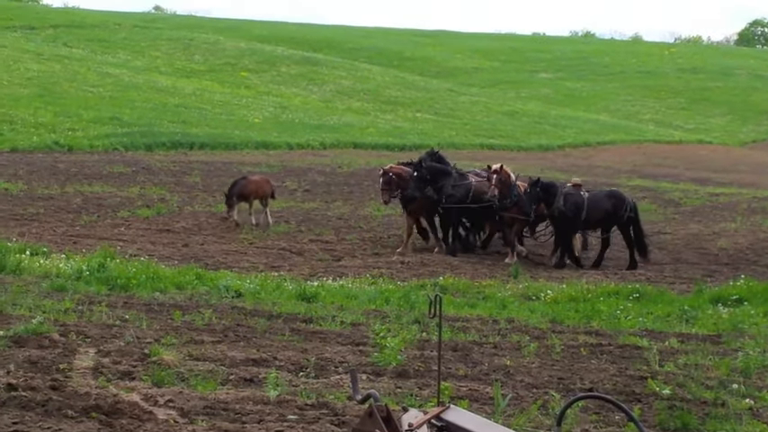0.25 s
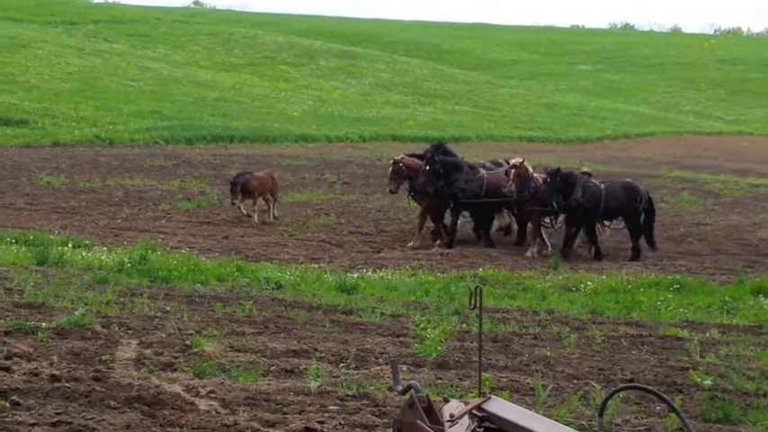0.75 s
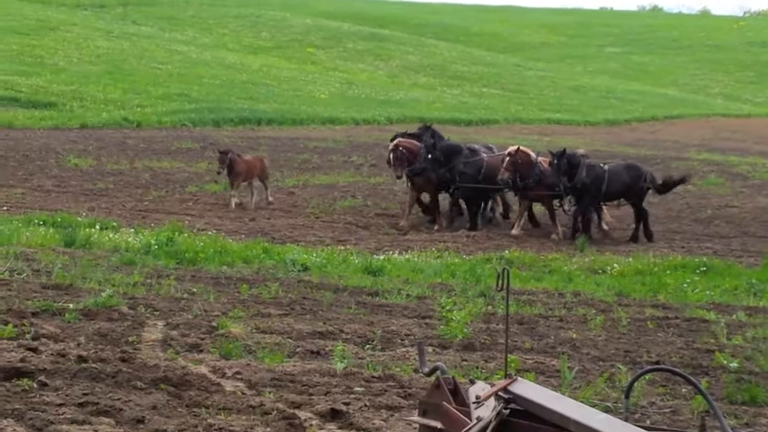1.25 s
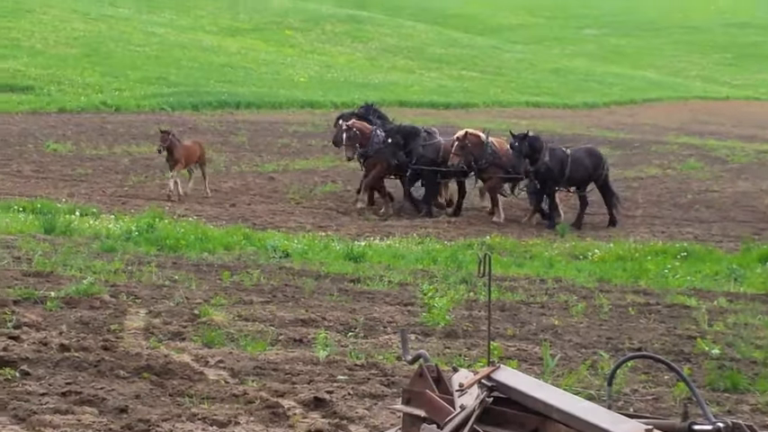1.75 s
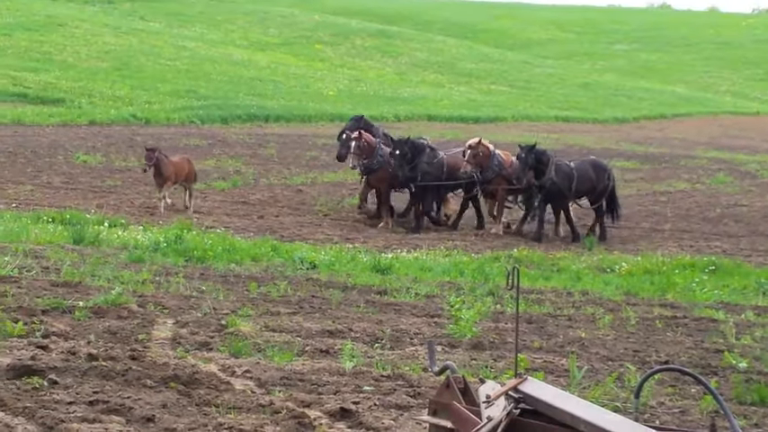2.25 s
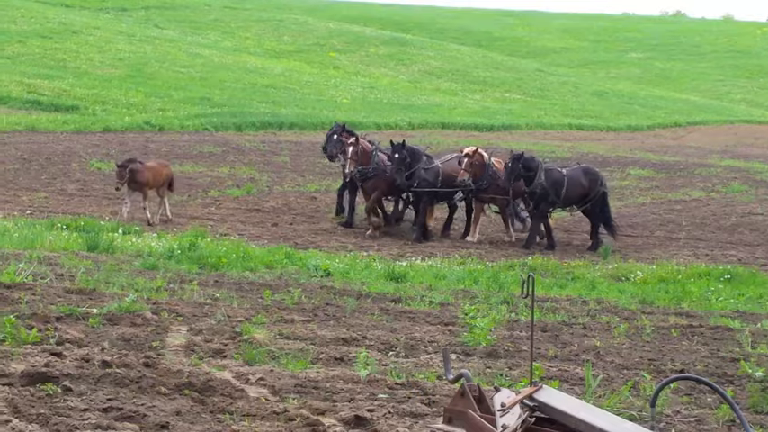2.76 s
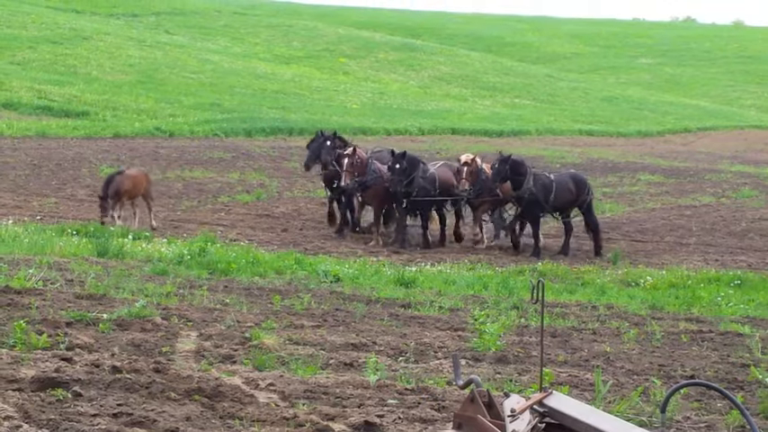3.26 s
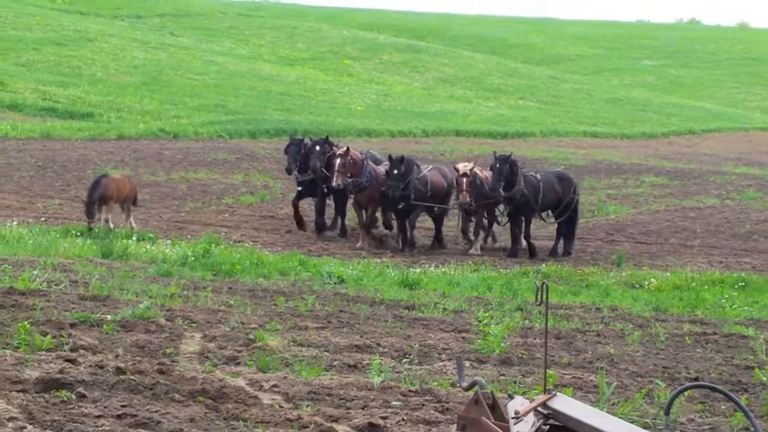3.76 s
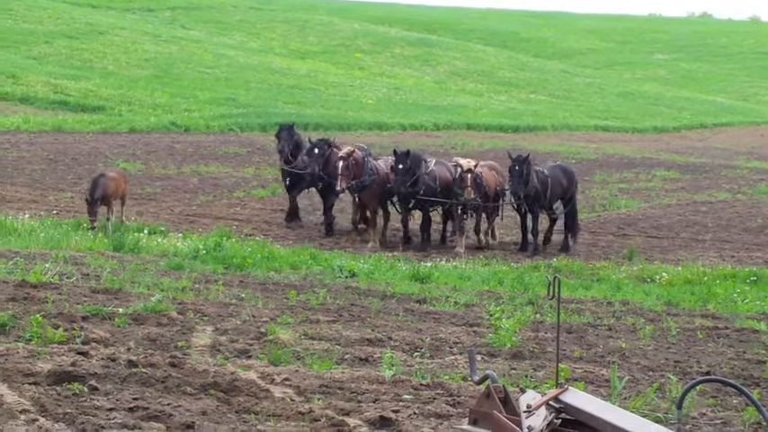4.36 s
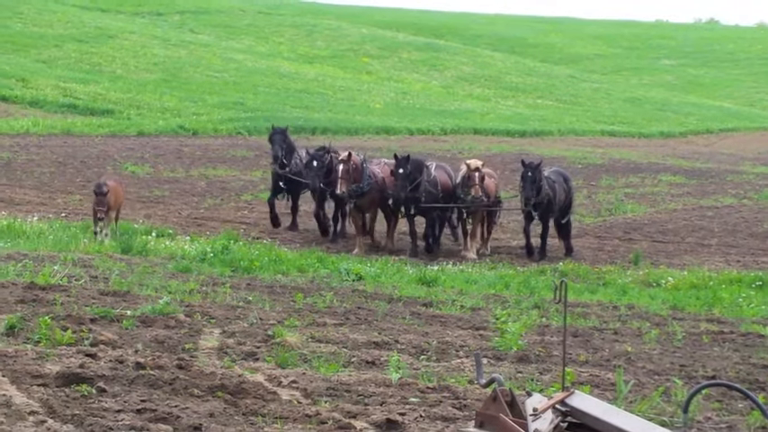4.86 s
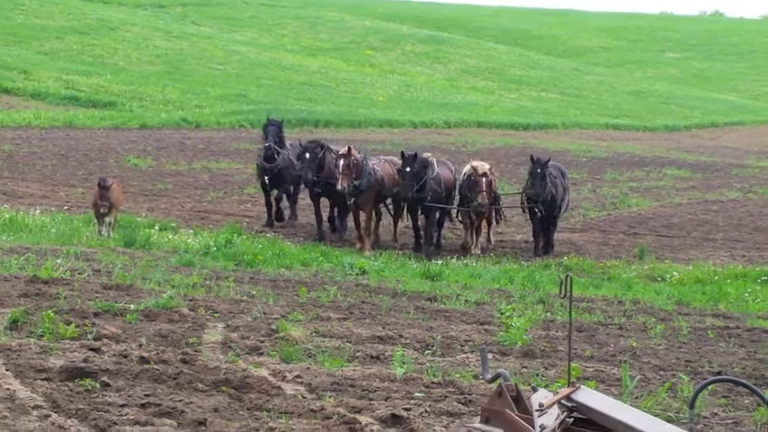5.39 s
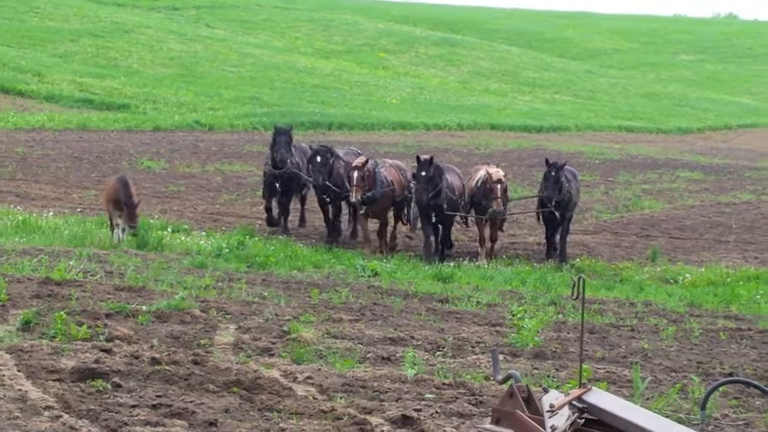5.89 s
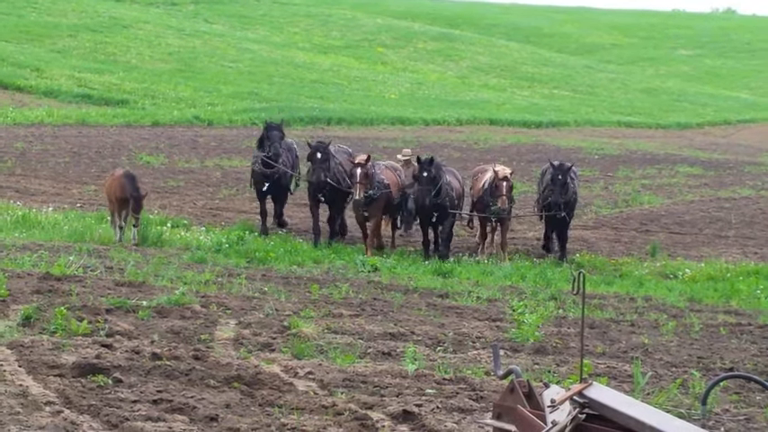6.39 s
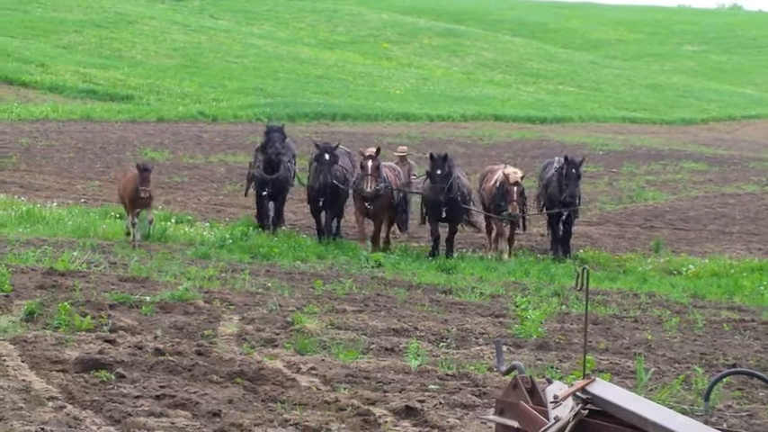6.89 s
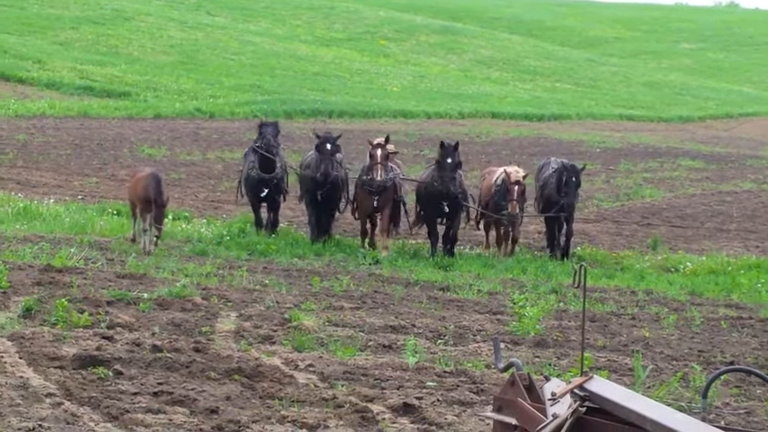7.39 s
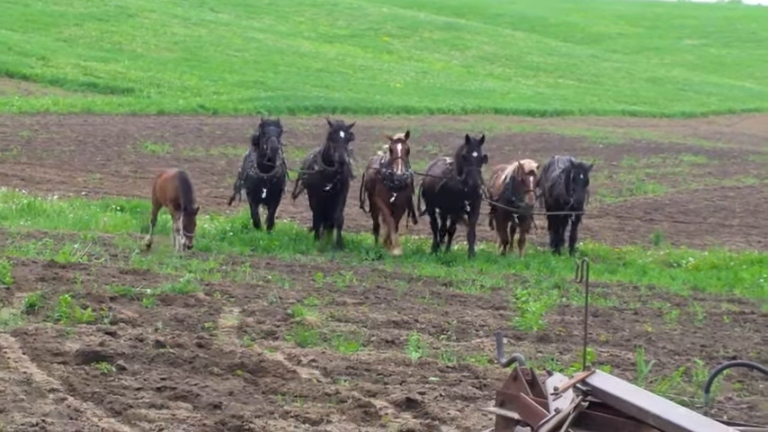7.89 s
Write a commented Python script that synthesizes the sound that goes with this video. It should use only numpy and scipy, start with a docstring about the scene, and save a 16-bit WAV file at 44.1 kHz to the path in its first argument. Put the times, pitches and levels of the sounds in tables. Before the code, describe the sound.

Harness chains jingle and clink as draft horses walk closer over soft soil, with birds, a light breeze and a distant engine hum.

```python
"""Draft horses in a field

A team in harness walks closer over tilled ground. Chain links jingle and clink as they hit
each other, hitch bars knock, rings ping, and iron creaks as it sticks and slips.
Soil and leather rustle, and hooves thud softly. Small birds whistle gliding notes,
and a far engine hums and throbs under a light breeze."""
import sys
import numpy as np
from scipy import signal
from scipy.fft import rfft, irfft
from scipy.io import wavfile
from scipy.ndimage import uniform_filter1d

SR = 44100
rng = np.random.default_rng(int(sys.argv[2]) if len(sys.argv) > 2 else 0)


def transcribe(u):
    """Save the signal u as a 16-bit wav file named by the first command-line argument.

    u: samples, shape (n,) or (channels, n), limited to [-1, 1]; the rate is SR.
    q: integer samples, one column per channel.
    """
    v = np.clip(np.atleast_2d(u).T, -1, 1)
    q = np.round(v * 32767).astype(np.int16)
    wavfile.write(sys.argv[1], SR, q)


N = 358885
T = np.arange(N) / SR

# Levels compare the rows of a table; each source sets its own overall loudness.
# A "fade" (t60 in the code) is the time a sound takes to drop by 60 dB.
# the team grows louder as it nears: t/s, jingle level/dB, rustle level/dB
TEAM_LEVELS = [(0, -72, -73.5), (0.55, -72.5, -81), (0.85, -68, -70.5), (1.75, -63, -70), (2.2, -67, -73.5),
               (3.0, -68, -72.5), (3.6, -63.5, -68), (3.98, -70, -76), (4.45, -61, -66), (5.3, -59, -65.5),
               (5.65, -55.5, -61.5), (6.25, -57.5, -62), (6.85, -55, -60), (8.14, -51.5, -56.5)]
# the harness noise swells, mostly as a horse leans into its chains: t/s, boost/dB, settling time/s
TUGS = [(0.72, 12, 0.086), (1.55, 5.5, 0.25), (2.0, 14, 0.042), (2.42, 10.5, 0.32), (2.73, 12, 0.13),
        (3.40, 6, 0.16), (3.77, 8.5, 0.12), (4.12, 8, 0.21), (4.57, 3, 0.081), (5.18, 4.5, 0.1),
        (5.76, 3, 0.28), (6.07, 3.5, 0.057), (6.38, 4, 0.47), (6.62, 2, 0.078), (7.0, 2.5, 0.46),
        (7.42, 7, 0.21), (7.72, 9, 0.41), (7.96, 9, 0.082)]
# tone colour of the jingling chains: f/Hz, level/dB
JINGLE_SPECTRUM = [(3000, -5), (4500, 5), (5400, -10), (6300, 1), (7400, -1), (8400, -4), (9400, -18),
                   (10400, -12.5), (11600, -26.5), (13500, -11), (15500, -25)]
# the notes of the harness rings: f/Hz, level/dB, fade/s
RING_NOTES = [(5090, -2, .14), (5560, -4, .12), (9970, -1, .16), (10180, -3, .14), (10960, -8, .14),
              (13380, -11, .12)]
# how far each pitch of the harness leans left or right: f/Hz, left minus right/dB
HARNESS_BALANCE = [(1000, -5.5), (4000, -4), (5500, 8), (6500, 1), (7600, -17.5), (9000, -24), (10000, -25),
                   (11000, 2), (15000, -8)]
# chain links clash: t/s, level/dB, f/Hz, chatter relative to that level/dB
CLINKS = [(0.835, -44.5, 7150, -11), (1.587, -45, 6100, -7), (1.9685, -24, 7400, -26),
          (2.696, -31.5, 7090, -23), (2.752, -38, 7300, -16), (2.468, -40, 5560, -10.5),
          (3.4075, -35, 7380, -26), (4.104, -41, 7620, -11), (4.48, -34, 7700, -20),
          (4.5426, -24.5, 7540, -20), (4.79, -26.5, 7580, -18), (5.159, -29, 6700, -15),
          (5.37, -37, 7900, -23), (5.473, -38, 8270, -7.5), (5.704, -32, 7000, -12),
          (5.718, -38, 7900, -18), (5.779, -34, 8470, -22), (6.028, -24.5, 7170, -19),
          (6.043, -33, 7400, -14), (6.301, -34.5, 8540, -26), (6.353, -26.5, 7570, -37),
          (6.602, -38, 8450, -22), (6.6117, -21, 7130, -22), (6.648, -38, 7800, -25),
          (6.788, -30, 7760, -30), (6.963, -29, 6730, -17), (7.23, -37.5, 8600, -22),
          (7.263, -30, 8160, -15), (7.42, -31.5, 7700, -18), (7.588, -38, 9400, -15),
          (7.641, -37, 7400, -24), (7.673, -38.5, 8350, -4), (7.7032, -32.5, 8000, 1),
          (7.937, -30.5, 9100, -12.5), (7.993, -34, 8630, -10.5), (8.1294, -27.5, 7730, -18)]
# hitch bars and buckles knock: t/s, level/dB, f/Hz, bandwidth/Hz
KNOCKS = [(0.7153, -51, 2100, 1200), (1.968, -44, 3480, 1500), (1.9903, -37, 2550, 380),
          (2.397, -49, 2950, 700), (2.693, -48, 3820, 1700), (3.408, -47.5, 2500, 1400),
          (4.100, -48, 2090, 1300), (4.1767, -43, 1860, 1000), (4.236, -50.5, 2490, 600),
          (4.453, -47.5, 1650, 1300), (4.4828, -43, 2640, 900), (4.542, -43, 1900, 1400),
          (4.761, -43.5, 2860, 1000), (4.791, -46.5, 1640, 1000), (5.371, -48, 2550, 800),
          (5.476, -39, 1880, 1100), (5.497, -33, 2240, 1310), (5.719, -42.5, 2200, 1200),
          (5.778, -38.5, 3300, 1500), (5.8148, -42.5, 2300, 1000), (6.352, -41, 2270, 1700),
          (7.232, -39, 2970, 900), (7.264, -31.5, 4050, 1300), (7.641, -45, 3100, 900),
          (7.708, -20.5, 3420, 1400), (7.819, -36, 2930, 1200), (7.876, -37.5, 2350, 900)]
# small rings are struck, and the hitch iron rings on near 1.9 kHz after its creaks at 7.0 and 7.4 s: t/s,
# level/dB, f/Hz, fade/s
PINGS = [(1.99, -62, 13400, 0.19), (2.42, -59, 5100, 0.16), (2.70, -55, 7800, 0.28),
         (4.625, -55.5, 9980, 0.12), (4.797, -39, 9980, 0.092), (4.797, -59, 13400, 0.33),
         (5.652, -54, 10200, 0.11), (6.05, -48.5, 4780, 0.089), (6.136, -52, 10000, 0.081),
         (6.255, -51.5, 5530, 0.28), (6.484, -48.5, 9670, 0.32), (6.6, -49.5, 10000, 0.2),
         (6.995, -52.5, 1947, 0.42), (7.104, -42, 4410, 0.25), (7.104, -50, 5130, 0.39),
         (7.104, -56, 4900, 0.8), (7.104, -47.5, 9695, 0.79), (7.104, -48.5, 12530, 0.24),
         (7.339, -51, 10100, 0.4), (7.39, -48.5, 5150, 0.15), (7.40, -47.5, 9670, 0.28),
         (7.405, -47, 1936, 0.16), (7.45, -49, 11000, 0.54), (7.588, -50, 10150, 0.2),
         (7.588, -51, 11030, 0.22), (7.898, -45, 5550, 0.095), (7.995, -52, 13400, 0.15),
         (8.085, -52, 5100, 0.12), (8.085, -46.5, 10020, 0.25)]
# the hitch creaks under load: t/s, length/s, level/dB, roughness/0-1, brightness/dB per octave
CREAKS = [(1.506, 0.12, -67.5, 0.93, -12), (4.541, 0.071, -63.5, 0.86, -5), (5.485, 0.024, -47, 1, -16),
          (5.513, 0.083, -61, 1, -7), (5.702, 0.076, -59.5, 1, -23), (6.03, 0.1, -60.5, 1.05, 6),
          (6.764, 0.041, -51.5, 0.99, -13), (6.983, 0.084, -51, 0.66, -8.5), (7.388, 0.056, -54, 0.91, -12),
          (7.7086, .038, -19.5, 0.27, 2.5), (7.743, 0.062, -39.5, 0.64, 6), (7.924, 0.056, -46, 1, -18),
          (7.979, 0.038, -42, 0.64, -2.5)]
# the notes of the hitch iron: f/Hz, bandwidth/Hz, level/dB, left minus right/dB
IRON_NOTES = [(1378, 10, -7.5, -1), (1913, 8.8, -9, -6), (1950, 10, -6, -6), (2372, 13, -4.5, -7),
              (2550, 12.3, 4.7, -7), (2684, 18, -3, -7), (3190, 23, 3.7, -7), (3930, 21, -5, -7),
              (5550, 12, -22, -6), (6490, 60, -30, -6), (7400, 37, -7, -9), (8360, 78, -14, -9),
              (9650, 40, -14, -9)]
# tone colour of soil and leather: f/Hz, level/dB
RUSTLE_SPECTRUM = [(450, -5), (720, -3), (1100, -7.5), (1600, -7.5), (2400, 0), (3200, -1), (4500, 2),
                   (6000, -5), (10000, 2.5), (15000, -16)]
# the rustle's treble, duller from afar: t/s, level/dB
RUSTLE_TREBLE = [(0, -5), (2.0, -7.5), (3.6, -7), (5.0, 0), (6.3, -1.5), (8.14, -2.5)]
# bird calls: t/s, number of notes, note spacing/s, note length/s, start f/Hz, middle f/Hz, end f/Hz,
# level/dB, first note softer by/dB, share scattered by the field/0-1
BIRD_CALLS = [(0.075, 2, .68, .09, 3350, 2950, 2200, -65, 2, .5),
              (0.215, 3, .385, .09, 1450, 1540, 1850, -67, 2, .5),
              (0.3, 3, .378, .05, 2150, 2850, 3300, -60.5, 2, .65),
              (0.615, 1, 0, .13, 8300, 7870, 7780, -55, 0, .3),
              (0.70, 2, .6, .085, 1950, 2020, 2400, -59.5, 0, .55),
              (0.83, 2, .595, .085, 2200, 2000, 2080, -60.5, 0, .75),
              (0.95, 3, .265, .165, 8000, 7450, 6050, -57, 5, .5),
              (1.63, 2, .21, .08, 2920, 2900, 2550, -62, 0, .7),
              (1.735, 1, 0, .08, 3120, 3150, 2800, -60, 0, .6),
              (2.985, 3, .4995, .056, 3450, 4170, 4250, -56, 10, .25),
              (3.084, 3, .495, .042, 3620, 4170, 4650, -54.5, 11, .25),
              (3.195, 3, .495, .075, 4830, 4960, 4880, -60, 6, .25),
              (3.247, 3, .501, .062, 4950, 4270, 3900, -53.5, 6, .25),
              (4.1, 2, .395, .09, 1720, 1930, 1880, -60, 0, .7),
              (4.475, 2, .095, .055, 3700, 4080, 4250, -56, 1, .35),
              (4.903, 3, .193, .075, 6700, 6100, 5900, -52, 3, .55),
              (4.69, 4, .21, .052, 4000, 4240, 4270, -55, 3, .45),
              (4.935, 3, .2, .09, 7700, 7000, 6500, -49, 1, .95),
              (4.94, 2, .19, .09, 2900, 3150, 3130, -58.5, 0, .6),
              (4.975, 3, .19, .06, 5100, 4800, 4350, -54, 3, .5),
              (5.494, 3, .142, .13, 4300, 6380, 7300, -49, 0, .82),
              (6.187, 3, .149, .1, 2480, 2260, 2250, -52.5, 0, .6)]
# the engine's firing tone swells on the breeze: t/s, level/dB
FIRING_LEVEL = [(0, -70), (0.95, -69), (1.65, -55.5), (2.3, -60.5), (3.8, -60), (4.1, -68), (4.5, -69),
                (4.95, -53), (5.4, -49), (6.6, -55.5), (7.0, -65), (7.3, -54.5), (8.14, -56)]
# its overtones swell in turn: peak t/s, multiple of the firing tone, level/dB
OVERTONE_SWELLS = [(0.12, 2, -71), (0.86, 2, -64), (1.82, 2, -63.5), (2.73, 2, -72.5), (3.52, 2, -66),
                   (4.25, 2, -67.5), (4.6, 2, -64.5), (5.33, 2, -65), (5.78, 2, -63.5), (6.22, 2, -65),
                   (7.07, 2, -64), (7.8, 2, -66), (0.42, 3, -75.5), (1.18, 3, -65.5), (2.03, 3, -71),
                   (2.47, 3, -73), (2.77, 3, -67), (3.3, 3, -71), (3.78, 3, -69.5), (4.04, 3, -69.5),
                   (5.92, 3, -66), (7.83, 3, -67), (1.72, 4, -74), (3.72, 4, -72), (4.14, 4, -70.5)]
# a faint whine from the same engine: t/s, level/dB
WHINE_LEVEL = [(0, -96), (3.8, -83.5), (5.3, -78), (8.14, -84)]
# loudness curve shared by the breeze and the hooves: t/s, level/dB
FIELD_LEVEL = [(0, -72.5), (1.5, -68), (4.2, -67.5), (5.3, -63), (6.7, -64), (7.5, -62), (7.9, -60),
               (8.14, -62.5)]
# tone colour of the breeze: f/Hz, level/dB
BREEZE_SPECTRUM = [(15, -24), (40, 1), (55, 16), (75, 11.5), (130, 8), (250, 3.5), (450, -2), (720, 1),
                   (1100, -3), (2000, -1.5), (5000, -6.5), (10000, -10.5), (15000, -12.5)]
# how alike the breeze is on the left and right: f/Hz, likeness/0-1
BREEZE_LIKENESS = [(60, 0.98), (130, 0.86), (290, 0.66), (640, 0.22), (1400, 0), (6000, 0), (15000, 0)]


def chains(ring_spread=0.0083):
    """Many small links tick together in flurries and keep the harness rings faintly ringing."""
    pitches = np.linspace(5800, 12500, 36) * rng.uniform(0.95, 1.02, 36)
    links = [0.42 * ring(hz, rng.uniform(0.97, 1) * 0.089, size=2500)
             + burst(hz, 5100, 0.029, size=2500) for hz in pitches]
    ticks = patter(links, per_s=700, spread_db=4.2)
    jingle = coloured(ticks * gain_of(2.26 * drift(35)), JINGLE_SPECTRUM)
    # no two rings are quite the same size, so their pitches differ a little
    notes = [gain_of(db) * ring(hz * (1 + ring_spread * rng.uniform(-0.99, 1)), t60, size=8000)
             for hz, db, t60 in RING_NOTES * 3]
    rings = gain_of(-8.5) * unit_rms(patter(notes, per_s=99, spread_db=2.0)) * panned(-3.0)
    return level(TEAM_LEVELS) * gain_of(tug_boost_db()) * (gain_of(3.0) * jingle + rings)


def tug_boost_db(rise_s=0.085):
    """Each swell shakes the harness: its noise rises quickly, then settles."""
    return sum(np.interp(T, [s - rise_s, s, s + settle_s], [0, db, 0]) for s, db, settle_s in TUGS)


def clinks():
    """A link snaps against its neighbour and bounces three times while the chain chatters."""
    out = np.zeros((2, N))
    for s, db, hz, chatter_db in CLINKS:
        gain = gain_of(db) * panned(value_at(HARNESS_BALANCE, hz) - 4)
        snap = burst(hz, 1500, .018) + .5 * ring(hz, .032) + 1.2 * ring(hz, .005)
        chatter = gain_of(chatter_db) * burst(hz, 1500, 0.2)
        add(out, s, gain * (gain_of(-7.5) * snap + chatter))
        for delay, strength in rng.random((3, 2)):
            bounce = strength * gain_of(chatter_db + 2.0) * burst(hz, 2000, 0.011)
            add(out, s + 0.0033 + 0.077 * delay, gain * bounce)
    return out


def knocks():
    """A hitch bar or buckle takes a short blow, then rattles and bounces twice."""
    out = np.zeros((2, N))
    for s, db, hz, width_hz in KNOCKS:
        gain = gain_of(db) * panned(-5)
        blow = burst(hz, width_hz, .011)[:1] + .6 * ring(hz, .014)[:1]  # [:1]: one wave for both sides
        rattle = gain_of(-5) * burst(hz, 2.2 * width_hz, 0.11)
        add(out, s, gain * (blow + rattle))
        for delay, strength in rng.random((2, 2)):
            bounce = strength * gain_of(-16) * burst(hz, width_hz, 0.009)
            add(out, s + 0.005 + 0.04 * delay, gain * bounce)
    return signal.sosfilt(signal.butter(2, 1000, "high", fs=SR, output="sos"), out)


def pings():
    """A hanging ring is struck; its two close notes make it shimmer as it fades."""
    out = np.zeros((2, N))
    for s, db, hz, t60 in PINGS:
        tone = ring(hz, t60, size=16000)
        tone += .6 * ring(hz * rng.uniform(1.004, 1.012), t60 / 2, size=16000)
        add(out, s, gain_of(db) * panned(-16) * (tone[:1] + 0.34 * tone))
    return out


def creaks(slip_hz=637.5):
    """Iron sticks and slips on iron: even slips squeal, ragged ones rasp, and the grip ends the sound."""
    out = np.zeros((2, N))
    bass_cut = signal.butter(4, 1250, "high", fs=SR, output="sos")  # a small part gives off no bass
    for s, length, db, rough, tilt_db in CREAKS:
        t = np.arange(round((length + 0.0067) * SR)) / SR
        rough = np.clip(rough, 0, 1)
        squeal = sum(np.cos(2 * np.pi * k * slip_hz * t) for k in range(3, 6))
        rasp = rng.standard_normal(len(t)) + .5 * rng.standard_normal((2, len(t)))
        friction = (1 - rough) * .5 * squeal + (4 * rough + .3) * rasp
        friction *= np.exp(-t / length)  # the load eases as the iron gives
        friction[:, 0] += 90  # the first blow sets every note ringing
        iron = np.zeros_like(friction)
        for hz, width_hz, note_db, balance_db in IRON_NOTES:
            decay = np.exp(-np.pi * width_hz / SR)
            loose_hz = hz * (1 + 0.025 * rough ** 2)  # loosely held iron rings a little higher
            note = signal.lfilter([1], [1, -decay * np.exp(2j * np.pi * loose_hz / SR)], friction).imag
            iron += gain_of(note_db + tilt_db * np.log2(hz / slip_hz)) * panned(balance_db) * note
        grip = np.clip(t / 0.001, 0, 1) * np.clip((length - t) / 0.019 + 0.5, 0, 1)
        scrape = panned(-1.0) * burst(2750, 1800, .22, size=len(t))
        add(out, s, gain_of(db) * signal.sosfilt(bass_cut, (unit_rms(iron) + scrape) * grip))
    return out


def soil(tug_share=0.82):
    """Clods crumble and leather rubs: a fine, dry crackle that brightens as it nears."""
    crumbs = [burst(hz, 2230, 0.0089, size=600) for hz in np.geomspace(1200, 7000, 20)]
    crackle = patter(crumbs, per_s=2200, spread_db=3.2) * gain_of(1.2 * drift(45))
    rustle = coloured(crackle + 0.23 * crackle[::-1], RUSTLE_SPECTRUM)  # the sides blend a little
    body = signal.sosfiltfilt(signal.butter(4, 3400, fs=SR, output="sos"), rustle)
    treble = level(RUSTLE_TREBLE) * (rustle - body)
    return gain_of(5.5 + tug_share * tug_boost_db()) * level(TEAM_LEVELS, column=2) * (body + treble)


def hooves():
    """Hooves sink out of step into soft ground, louder as they near."""
    thuds = [burst(hz, 220, .06)[:1] * panned(-3) for hz in np.geomspace(140, 330, 10)]
    return gain_of(-6.5) * level(FIELD_LEVEL) * unit_rms(patter(thuds, per_s=22, spread_db=1.2))


def birds(warble_depth=0.0446, pitch_spread=0.0283, echo_fade_s=0.35):
    """Birds repeat a gliding whistle; far ones warble and arrive mostly as echo from the field."""
    direct, scattered = np.zeros((2, N)), np.zeros((2, N))
    for s, count, spacing, length, start_hz, middle_hz, end_hz, db, softer_db, scatter in BIRD_CALLS:
        progress = np.linspace(0, 1, round(length * SR))
        glide_hz = np.polyval(np.polyfit([0, .5, 1], [start_hz, middle_hz, end_hz], 2), progress)
        soft_edges = signal.windows.tukey(len(progress), .5)
        for k in range(count):
            warble = unit_rms(uniform_filter1d(rng.standard_normal(SR), size=60))[:len(progress)]
            off_pitch = pitch_spread * rng.uniform(-0.993, 1)
            hz = glide_hz * (1 + scatter * (warble_depth * warble + off_pitch))
            gain = gain_of(db - softer_db * (k == 0)) * panned(0.14)
            note = gain * np.sin(phase_of(hz)) * soft_edges
            add(direct, s + k * spacing, np.sqrt(1 - scatter) * note)
            add(scattered, s + k * spacing, np.sqrt(scatter) * note)
    echo = rng.standard_normal((2, SR // 2)) * gain_of(-60 * T[:SR // 2] / echo_fade_s)
    return direct + signal.oaconvolve(scattered, echo / np.linalg.norm(echo[0]), axes=1)[:, :N]


def engine(firing_hz=91.4, shaft_hz=108.8, whine_hz=652):
    """A far engine's firing and shaft tones throb against each other; overtones come and go."""
    lead_s = np.array([[-.00035], [0]])  # the sound reaches the right side first
    firing = phase_of(firing_hz + 0.308 * drift(1.4)) + 2 * np.pi * firing_hz * lead_s
    shaft = phase_of(shaft_hz + 0.39 * drift(1.456)) + 2 * np.pi * shaft_hz * lead_s
    shaft_db = -65.5 + 0.98 * T + 1.6 * drift(4.1)  # wavers and slowly grows
    hum = level(FIRING_LEVEL) * np.sin(firing)
    hum += gain_of(shaft_db) * (np.sin(shaft) + gain_of(-12.5) * np.sin(shaft / 2))
    for k in (2, 3, 4):
        width_s = 0.34 / k  # higher overtones swell more briefly
        swell = sum(gain_of(db) * np.exp(-((T - s) / width_s) ** 2)
                    for s, multiple, db in OVERTONE_SWELLS if multiple == k)
        gain = np.hypot(swell, gain_of(-80.5))  # never quite silent between swells
        hum += gain * np.sin(k * firing + 0.46 * drift(9))
    whine_gain = level(WHINE_LEVEL) * gain_of(2.5 * drift(5.5))
    whine = whine_gain * np.sin(phase_of(whine_hz + 3 * drift(9.5)))
    return np.sqrt(2) * (hum + whine) * panned(-3.5)


def breeze():
    """Air moves over the field: soft, wide noise, alike on both sides in the bass."""
    hz = np.fft.rfftfreq(N, 1 / SR)
    left, unrelated = rfft(rng.standard_normal((2, N)))
    alike = value_at(BREEZE_LIKENESS, hz)
    right = alike * left + np.sqrt(1 - alike ** 2) * unrelated
    noise = irfft(np.array([left, right]) * gain_of(value_at(BREEZE_SPECTRUM, hz)), N)
    return gain_of(5.5 + 1.43 * drift(18)) * level(FIELD_LEVEL) * unit_rms(noise) * panned(-3.5)


def ring(hz, t60, size=4000):
    """One fading note of struck metal, its left and right waves out of step by chance."""
    t = np.arange(size) / SR
    tone = np.sin(2 * np.pi * (hz * t + rng.random((2, 1))))
    return tone * np.exp(-np.log(1000) * t / t60) * (1 - np.exp(-t / .0001))


def burst(hz, width_hz, t60, size=4000):
    """Fading noise around hz, like many close notes struck at once, with a peak of 1."""
    t, f = np.arange(size) / SR, np.fft.rfftfreq(size, 1 / SR)
    noise = rng.standard_normal((2, size)) * np.exp(-np.log(1000) * t / t60)
    resonance = 1 / (1 + 1j * (f ** 2 - hz ** 2) / (f * width_hz + 1)) ** 2
    sound = irfft(rfft(noise) * resonance, size)
    return sound / abs(sound).max(axis=1, keepdims=True)


def patter(sounds, per_s, spread_db):
    """Plays short sounds at random moments, most of them soft and a few loud."""
    out = np.zeros((2, N))
    for sound in sounds:
        chance, strength = rng.random(N), np.minimum(rng.exponential(1, N), 4)
        hits = (chance < per_s / len(sounds) / SR) * gain_of(spread_db * strength)
        out += signal.oaconvolve(hits[None], sound, axes=1)[:, :N]
    return out


def coloured(x, spectrum):
    """Gives a sound of the team its tone colour and its place between left and right."""
    hz = np.fft.rfftfreq(N, 1 / SR)
    gain = gain_of(value_at(spectrum, hz)) * panned(value_at(HARNESS_BALANCE, hz))
    return unit_rms(irfft(rfft(x) * gain, N))


def drift(per_s):
    """A random wobble of typical size 1 that heads for a new value per_s times a second."""
    targets = rng.standard_normal(4000)
    return unit_rms(np.interp(T * per_s, np.arange(len(targets)), targets))


def phase_of(hz):
    """The running angle of a wave whose pitch changes."""
    return 2 * np.pi * np.cumsum(hz) / SR


def gain_of(db):
    """Turns decibels into a number to multiply by."""
    return 10 ** (np.asarray(db) / 20)


def unit_rms(x):
    """Scales a signal so its average strength (rms) is 1."""
    return x / np.sqrt(np.mean(x ** 2) + 1e-20)


def value_at(table, hz):
    """Looks up a frequency table at hz, with octaves evenly spaced."""
    f, value = np.transpose(table)
    return np.interp(np.log(hz + 1), np.log(f), value)


def level(table, column=1):
    """Turns a table of decibels over time into a gain for every sample."""
    rows = np.array(table)
    return gain_of(np.interp(T, rows[:, 0], rows[:, column]))


def panned(balance_db):
    """Left and right gains; a positive balance leans left."""
    return gain_of(np.array([[.5], [-.5]]) * balance_db)


def add(mix, s, sound):
    """Mixes a stereo sound in at s seconds."""
    part = mix[:, max(round(s * SR), 0):][:, :sound.shape[1]]
    part += sound[:, :part.shape[1]]


def scene():
    """The team, the birds and the far background together."""
    team = chains() + clinks() + knocks() + pings() + creaks() + soil() + hooves()
    return team + birds() + engine() + breeze()


def record(dry):
    """Cuts the very highest treble, above 15650 Hz."""
    treble_cut = signal.firwin(511, 15650, window=("kaiser", 9), fs=SR)
    return signal.oaconvolve(dry, treble_cut[None], "same")


dry = scene()
out = record(dry)
transcribe(out)
```